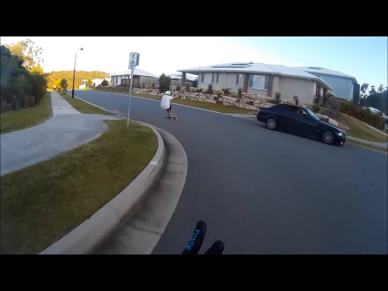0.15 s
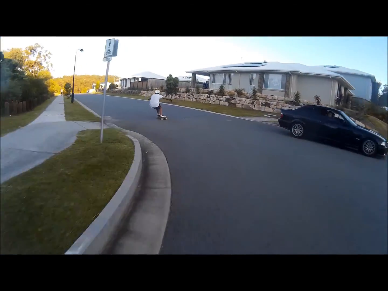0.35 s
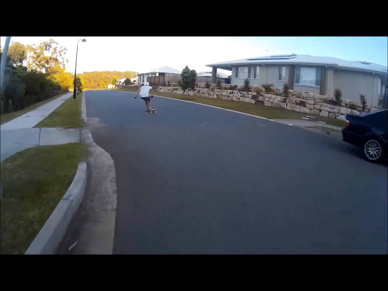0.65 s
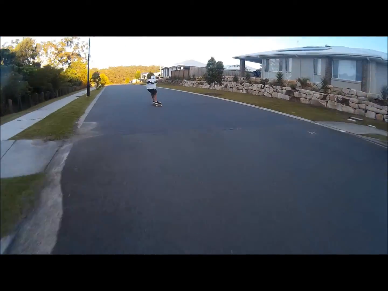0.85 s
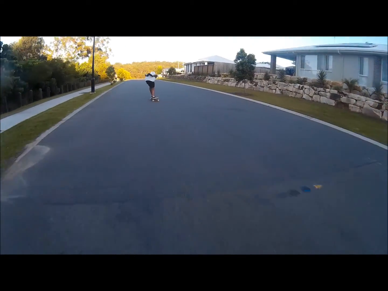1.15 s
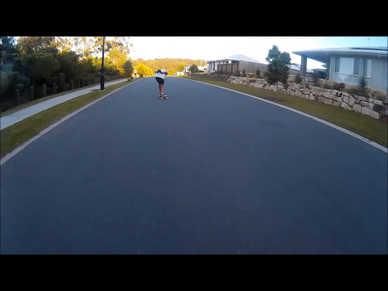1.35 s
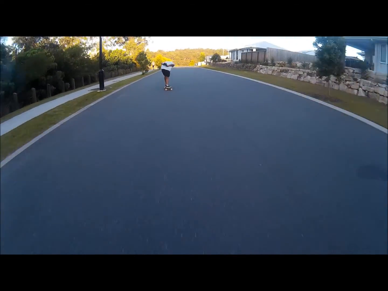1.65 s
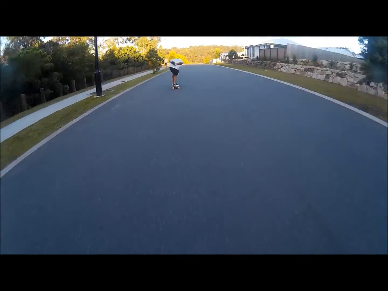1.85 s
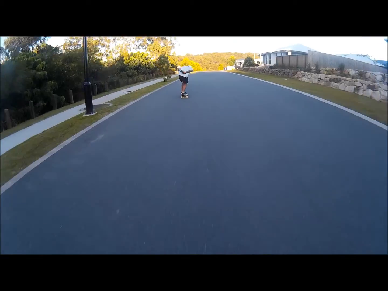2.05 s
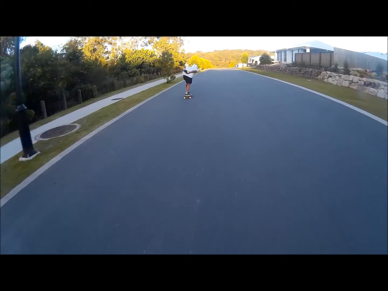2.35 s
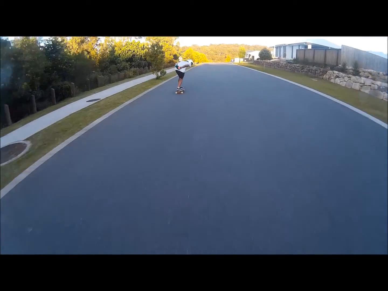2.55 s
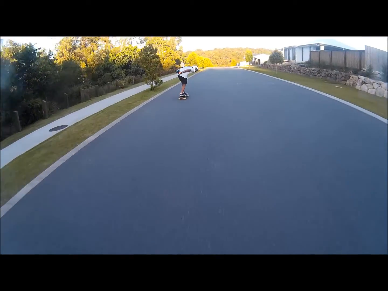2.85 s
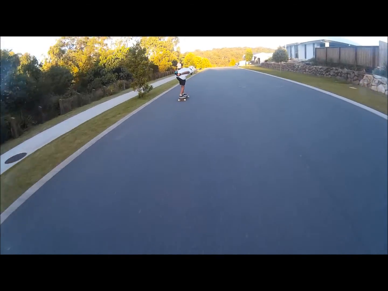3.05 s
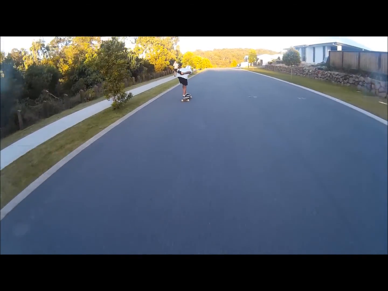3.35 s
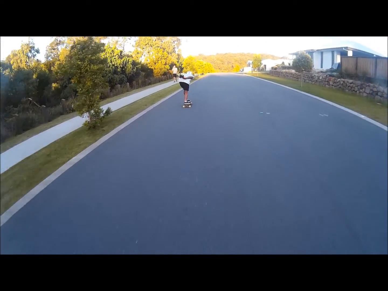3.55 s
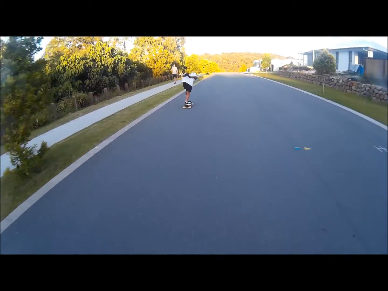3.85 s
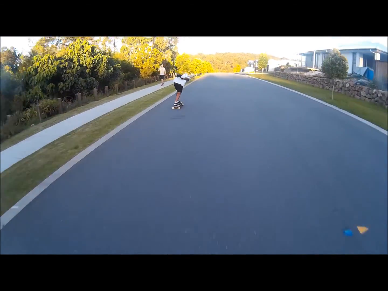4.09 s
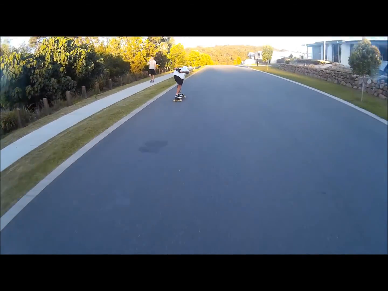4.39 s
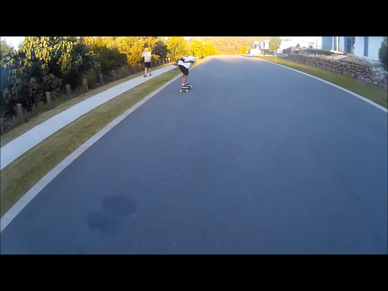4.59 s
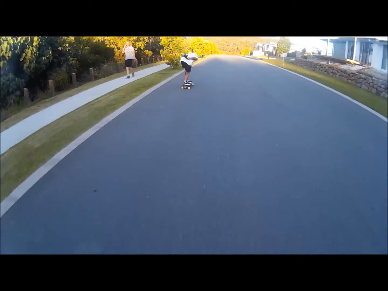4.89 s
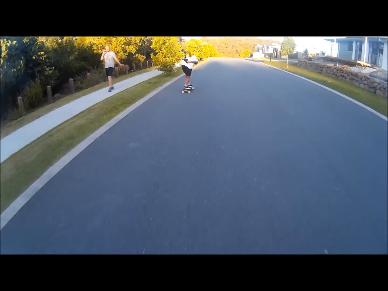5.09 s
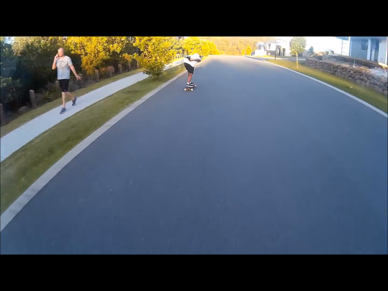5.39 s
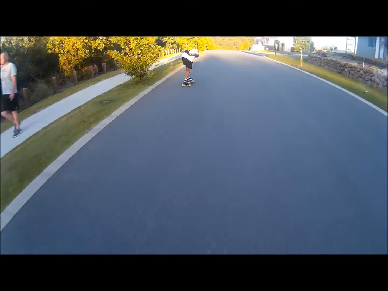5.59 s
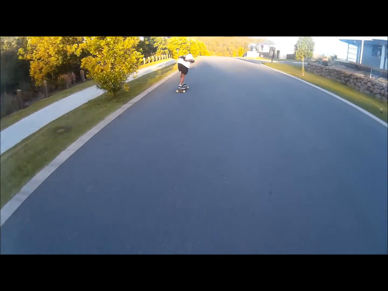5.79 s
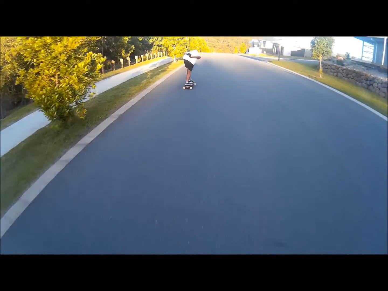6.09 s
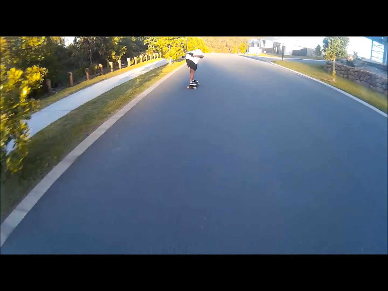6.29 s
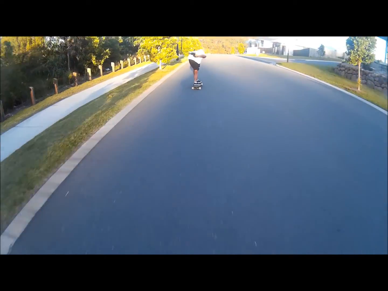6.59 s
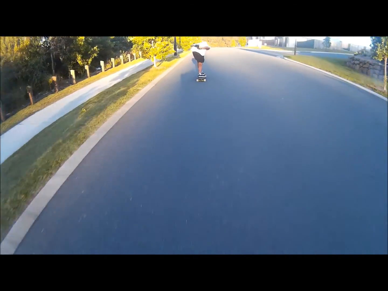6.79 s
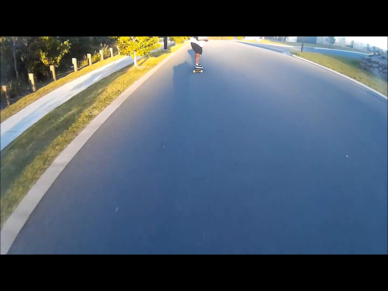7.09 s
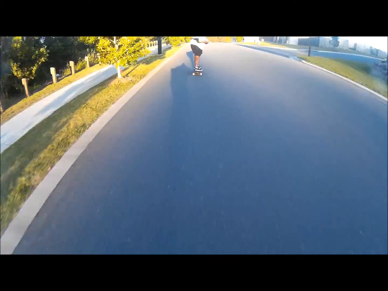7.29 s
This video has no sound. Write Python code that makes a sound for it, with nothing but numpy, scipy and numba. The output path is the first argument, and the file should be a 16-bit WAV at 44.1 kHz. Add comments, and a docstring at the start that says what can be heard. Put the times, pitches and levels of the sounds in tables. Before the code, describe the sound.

A boxy, muffled rush of skateboard wheels on a street, wind rumbling underneath, broken past midway by a double knock with rattling between.

```python
"""Longboard on asphalt

A longboard rolls fast down an asphalt street, heard from a cased camera that the rider carries. Road grit is
noise shaped by the resonances of wheels and deck; wind is low noise swelling in gusts. A stone chip ticks, then
a flurry of eight blows rings the case; each is a set of fading tones with a rattle. The knocks overload the
camera, and its gain control turns the rolling down for a moment."""
import sys
import numpy as np
from scipy import signal
from scipy.fft import rfft, irfft
from scipy.io import wavfile
from scipy.ndimage import uniform_filter1d
from numba import njit

SR = 44100
rng = np.random.default_rng(int(sys.argv[2]) if len(sys.argv) > 2 else 0)


def to_wav(s):
    """Save 16-bit WAV."""
    ch = np.atleast_2d(s).T  # columns
    pcm = np.round(np.clip(ch, -1, 1) * 32767)  # PCM
    wavfile.write(sys.argv[1], SR, pcm.astype(np.int16))


N = 328104
TIME = np.arange(N) / SR
FREQS = np.maximum(np.fft.rfftfreq(N, 1 / SR), 1)  # kept above zero so that its logarithm exists

# How hard the wheels roll, more on coarse asphalt and less on smooth: (time [s], level [dB])
ROLLING = [(0, -32.5), (0.52, -32), (1.22, -32.0), (1.68, -38.5), (2.12, -36), (2.34, -40.0), (2.75, -41),
           (3.08, -39), (3.74, -38.5), (3.86, -42), (4.4, -40.2), (5.58, -41), (5.68, -44), (6.05, -45),
           (6.22, -41.9), (7.05, -44.5), (7.28, -42.5), (7.44, -44)]
# Resonances of wheels and deck, heard through the case: (frequency [Hz], width [Hz], level [dB])
BOARD_RESONANCES = [(176.6, 76, -7), (387, 117, -4), (486.3, 140, -0.1), (686, 267, -6.5), (998, 203, -6),
                    (1122, 52, -6), (1319, 210, -6), (1807, 356, -13.5), (2107, 230, -18),
                    (3150, 670, -29.5), (4170, 750, -37), (4620, 800, -43)]
# Tone colour of the wind on the case: (frequency [Hz], relative level per Hz [dB])
WIND_COLOUR = [(12, -17), (25, -11.5), (42, 4.5), (58, 5), (78, -4.5), (110, -8.5), (170, -14.5),
               (260, -10.5), (500, -46), (4000, -93)]
# Single buffets of wind: (time of peak [s], length [s], rise [dB])
GUSTS = [(0.197, 0.12, 5), (1.13, 0.13, 1), (1.402, 0.16, 4.5), (2.145, 0.21, 2.5), (2.86, 0.28, 7),
         (3.295, .14, 4), (4.2, 0.5, 7)]
# Ring of a stone chip flicked by a wheel: (frequency [Hz], level [dB], time to fall 60 dB [s])
CHIP_TONES = [(2150, -39, .014), (3050, -35, .016), (3600, -40, .01), (4100, -35, .014)]
# Blows on the camera: (time [s], relative strength [dB], first contact time [ms], first rattle [dB],
# sway of the mount [dB], change of strength per rebound [dB], gap between rebounds [s])
BLOWS = [(4.4482, 5, 0.25, -5.5, -18, -0.5, .0069), (4.5383, -0.5, 0.66, -3, 2, -1, 0.0029),
         (4.545, -7.5, 0.36, -8, 5, -11, 0.0051), (4.561, 4, 0.78, -17, -1, -20, 0.0037),
         (4.574, -1, 0.25, 0.5, -1, -5, .0035), (4.5881, 9.5, .6, -28.5, -22, 2.5, 0.0027),
         (4.6789, -6, 0.35, -8, 14, -6, 0.0049), (4.6965, 11, 0.059, 1.5, -4.5, 0, .0052)]
# Tones of the case, the two lowest being the sway of its mount:
# (frequency [Hz], relative level [dB], time to fall 60 dB [s])
CASE_TONES = [(54.5, -9.5, 0.214), (76, -10.5, 0.2), (112, -18.5, 0.13), (133, -9, 0.088),
              (317.6, -2, 0.034), (376, -16, 0.097), (460, -9, 0.065), (734, -9.5, 0.048),
              (860, -8.5, 0.026), (1050, -21, 0.039), (1200, -20.5, 0.056), (1312, -16.5, 0.065),
              (1758, -7, 0.063), (1908, -7, .04), (3030, -12.5, 0.025), (4060, -11.5, 0.015)]
# Tone colour of the loose mount, heard through the case: (frequency [Hz], relative level per Hz [dB])
RATTLE_COLOUR = [(40, -49), (120, -16), (220, -15), (380, 9.5), (650, -4.5), (1300, -11.5), (2000, -15.5),
                 (2450, -35.5), (3200, -33.5), (4700, -40.5), (5400, -64), (12000, -70)]
# Ring of a metal part set off by the hardest blow: (frequency [Hz], level [dB], time to fall 60 dB [s])
METAL_TONES = [(185.5, -22, 0.42), (1600, -27, 0.32), (2094, -4.5, 0.11)]

DRONE_DB, RASP_DB = -1.94, -7.0  # against the rolling level, at the top of the run
DULLING_DB_PER_S = 0.33  # down the street the drone gains and the rasp loses this much
WIND_DB, WIND_RISE_DB_PER_S = -7, 0.06  # starting level against the rolling level, and its slow rise
CHIP_S, METAL_S = 3.2878, 4.6975  # when each starts to ring
REBOUND_SOFTENING, REBOUND_RATTLE_DB = 2.18, -1  # per rebound: factor on contact time, change of rattle
HISS_DB, TOP_HZ = -68, 15200  # hiss against full scale, and the highest pitch the camera lets through


def undb(db):
    """Turn decibels into a plain multiplier."""
    return 10 ** (np.asarray(db) / 20)


def unit(x):
    """Scale a signal to an average strength (rms) of 1."""
    return x / np.std(x)


def walk(rate_hz):
    """Smooth random wandering of spread 1, about rate_hz turns a second."""
    smoothing = 1 / (1 + (FREQS / rate_hz) ** 4)
    return unit(irfft(rfft(rng.standard_normal(N)) * smoothing, N))


def noise(colour):
    """Noise of rms 1 with the tone colour of a table of frequencies and levels."""
    hz, db = np.transpose(colour)
    level_db = np.interp(np.log(FREQS), np.log(hz), db)
    return unit(irfft(rfft(rng.standard_normal(N)) * undb(level_db), N))


def fading_tones(table):
    """One dying sine wave per row, half a second long."""
    hz, db, t60 = np.transpose(table)[:, :, None]
    t = TIME[:SR // 2]
    return undb(db - 60 * t / t60) * np.sin(2 * np.pi * hz * t)


def rolling_level_db():
    """How hard the wheels roll at every moment."""
    s, db = np.transpose(ROLLING)
    return np.interp(TIME, s, db)


def wheels(stone_db=2.0, flutter_db=0.28, flutter_hz=15, swell_db=0.33, swell_hz=7, split_hz=850):
    """Countless stones strike the wheels, whose resonances give a hollow drone below and a rasp above."""
    dulling_db = DULLING_DB_PER_S * TIME
    stone_strength = undb(stone_db * rng.exponential(size=N))
    grit = rng.standard_normal(N) * stone_strength
    grit *= undb(flutter_db * walk(flutter_hz))  # the load on the wheels flutters over the uneven road

    power = 0
    for hz, width_hz, db in BOARD_RESONANCES:
        distance = 2 * (FREQS - hz) / width_hz
        power = power + undb(db) ** 2 / (1 + distance ** 2) ** 2
    spectrum = rfft(grit) * np.sqrt(power)

    low_share = 1 / (1 + (FREQS / split_hz) ** 12)
    drone = unit(irfft(spectrum * low_share, N))
    rasp = unit(irfft(spectrum * (1 - low_share), N))
    drone = drone * undb(swell_db * walk(swell_hz))  # the drone surges over ripples in the road
    drone = drone * undb(DRONE_DB + dulling_db)
    rasp = rasp * undb(RASP_DB - dulling_db)
    return undb(rolling_level_db()) * (drone + rasp)


def wind(eddy_db=1.6, eddy_hz=13):
    """Eddies tumble over the case in a low, uneven rumble that follows the ride and swells in each gust."""
    gust_db = sum(db * np.exp(-(2 * (TIME - s) / length) ** 2) for s, length, db in GUSTS)
    ride_db = rolling_level_db() + WIND_DB + WIND_RISE_DB_PER_S * TIME
    return noise(WIND_COLOUR) * undb(ride_db + gust_db + eddy_db * walk(eddy_hz))


def ping(s, tones, contact_s=0.00031):
    """A small hard object gets one short, rounded push and rings out in its own tones."""
    spread_s = contact_s / 2 / np.pi
    push = np.exp(-.5 * ((TIME - s) / spread_s) ** 2)
    return signal.fftconvolve(push / push.sum(), fading_tones(tones).sum(0))[:N]


def stone_chip():
    """A stone flicked by a wheel ticks as its high tones die within hundredths of a second."""
    return ping(CHIP_S, CHIP_TONES)


def contacts(count=3):
    """The case chatters on its mount: each blow and its rebounds, with ever longer contact and less rattle."""
    hits = []
    for s, db, contact_ms, rattle_db, sway_db, rebound_db, gap_s in BLOWS:
        for k in range(count):  # the blow itself is number 0
            softened_ms = contact_ms * REBOUND_SOFTENING ** k
            hits.append((s + k * gap_s, db + k * rebound_db, softened_ms,
                         rattle_db + k * REBOUND_RATTLE_DB, sway_db))
    return hits


def knocks(rattle_s=0.0079, rattle_trim_db=-8.0, place_db=6.5, crackle_db=1.0, trim_db=1.0):
    """Each blow rings the case, duller the longer the contact, and shakes the loose mount."""
    ringing, shake = np.zeros(N), np.zeros(N)
    t = TIME[:SR // 2]
    tones, number = fading_tones(CASE_TONES), np.arange(len(CASE_TONES))
    for s, db, contact_ms, rattle_db, sway_db in contacts():
        push = t * np.exp(-1000 * t / contact_ms)  # strongest after contact_ms
        push /= push.sum()
        place = rng.standard_normal(len(CASE_TONES))  # every point of impact favours other tones
        weights = undb(place_db * place + sway_db * (number < 2))
        weights *= (-1.0) ** number  # neighbouring tones swing in opposition
        start = int(s * SR)
        span = slice(start, start + len(t))
        ringing[span] += undb(db) * signal.fftconvolve(push, weights @ tones)[:len(t)]
        shake[span] += undb(db + rattle_db) * np.cumsum(push) * np.exp(-t / rattle_s)
    crackle = undb(rattle_trim_db + crackle_db * walk(250))
    rattle = shake * noise(RATTLE_COLOUR) * crackle
    return undb(trim_db) * (ringing + rattle)


def metal_part():
    """A metal part, set off by the hardest blow, rings longer than most of the case."""
    return ping(METAL_S, METAL_TONES)


def scene():
    """Everything reaches one microphone inside the case."""
    return (wheels() + wind() + stone_chip() + knocks() + metal_part())[None]


@njit
def follow(x, attack_s, release_s):
    """Track the loudness, rising fast and falling slowly."""
    out, level = np.empty(len(x)), 0.
    for i in range(len(x)):
        size = abs(x[i])
        level += (size - level) / (SR * (attack_s if size > level else release_s))
        out[i] = level
    return out


def record(dry, low_cut_hz=24, threshold_db=-11.5, deepest_db=11.5, attack_s=0.0044, release_s=0.095):
    """Gain control ducks after loud blows, their first swings clip, the electronics hiss, the top is cut."""
    low_cut = signal.butter(2, low_cut_hz, "high", fs=SR, output="sos")
    sound = signal.sosfilt(low_cut, dry)
    loudness = follow(sound[0], float(attack_s), float(release_s))
    gain = 1 / np.clip(loudness / undb(threshold_db), 1, undb(deepest_db))
    gain = uniform_filter1d(gain, SR // 500)  # smooth over 2 ms
    sound = np.clip(sound * gain, -1, 1)
    sound = sound + undb(HISS_DB) * rng.standard_normal(N)
    top_cut = signal.ellip(8, .2, 70, TOP_HZ, fs=SR, output="sos")
    return signal.sosfilt(top_cut, sound)


dry = scene()
out = record(dry)
to_wav(out)
```